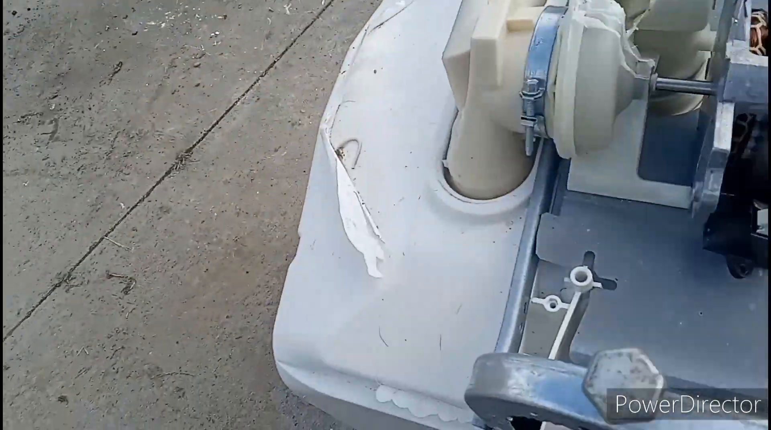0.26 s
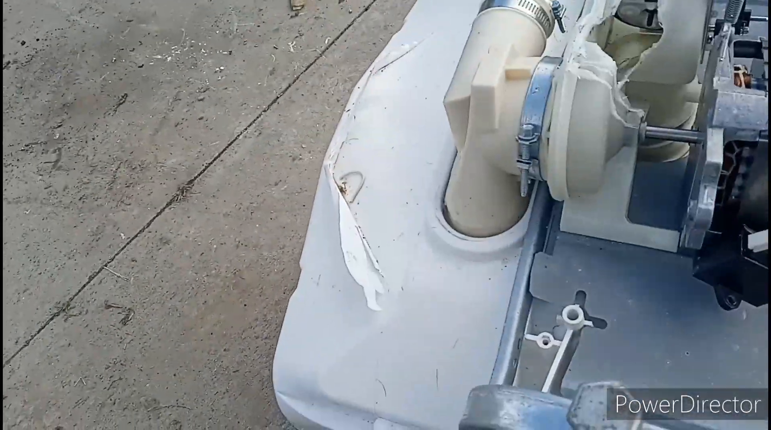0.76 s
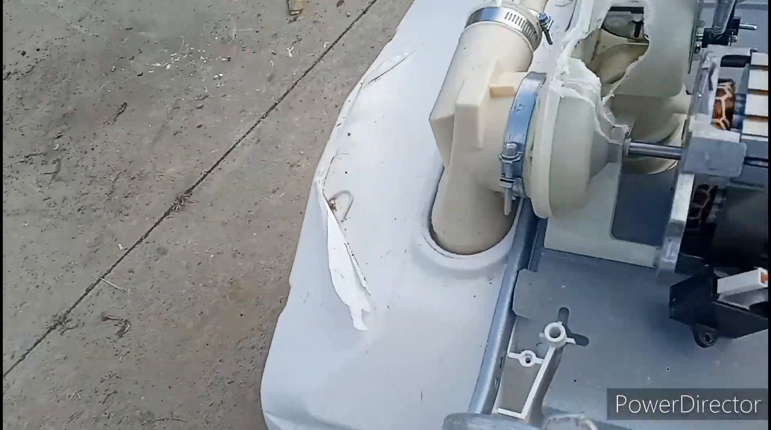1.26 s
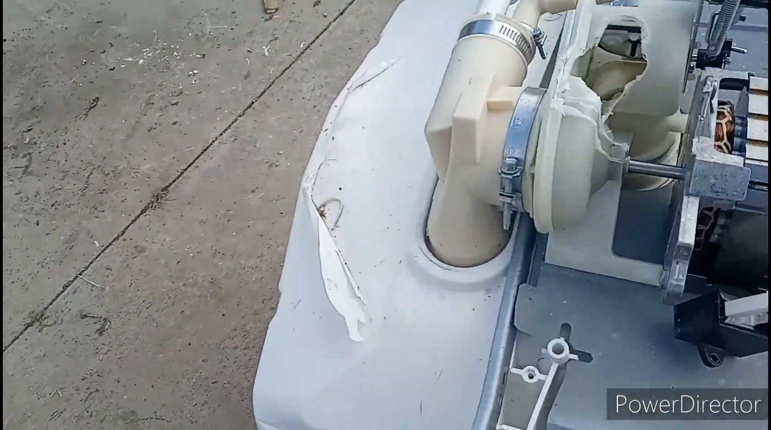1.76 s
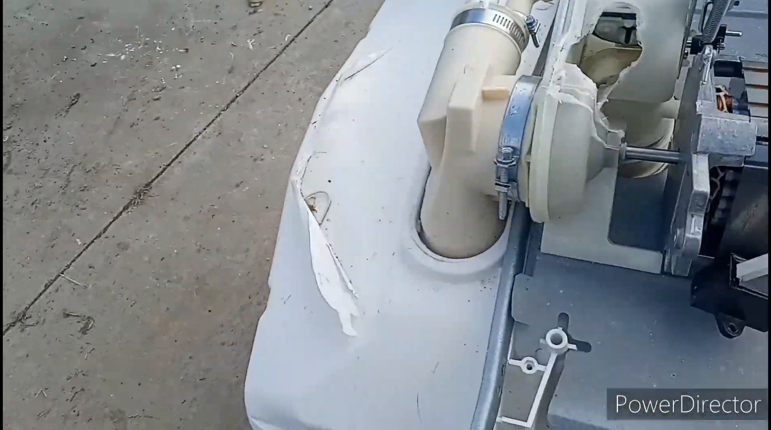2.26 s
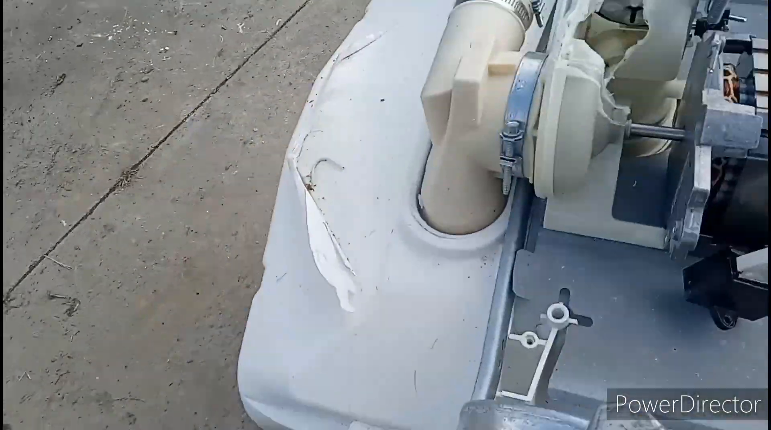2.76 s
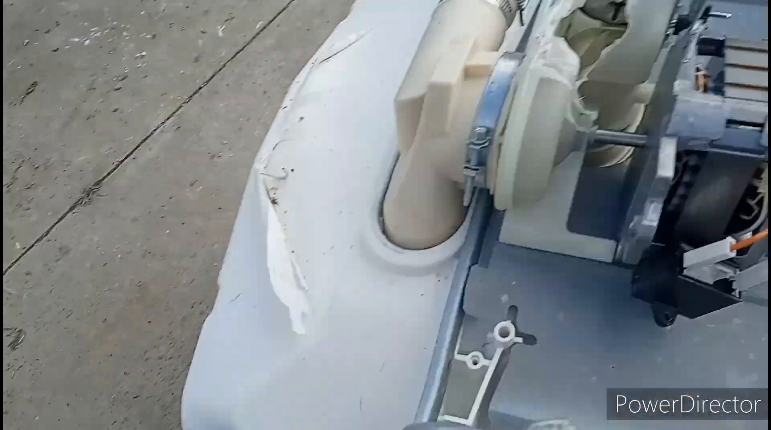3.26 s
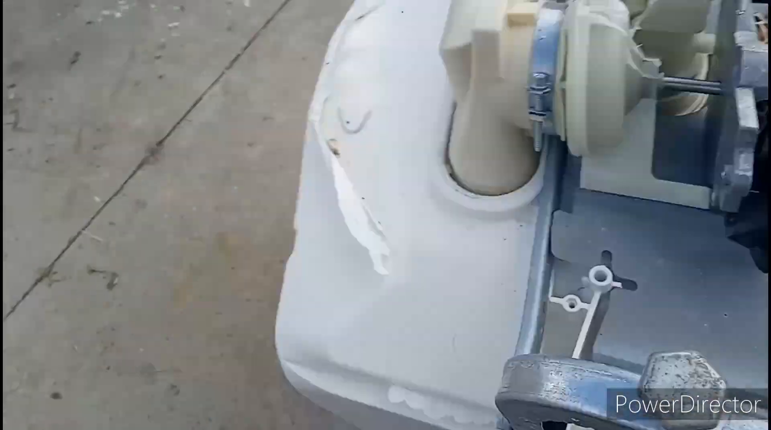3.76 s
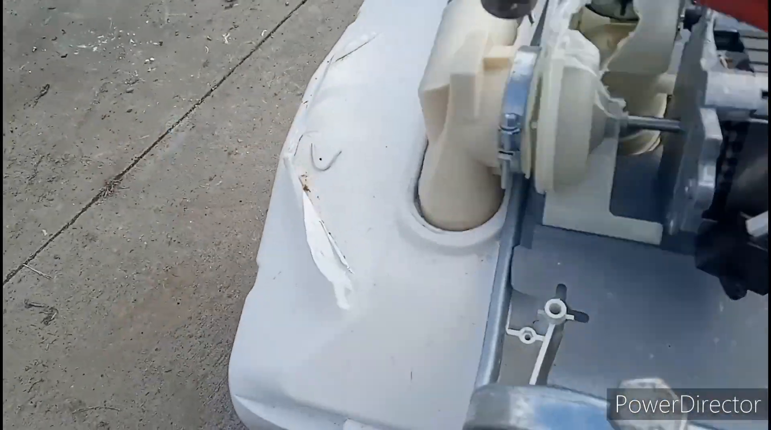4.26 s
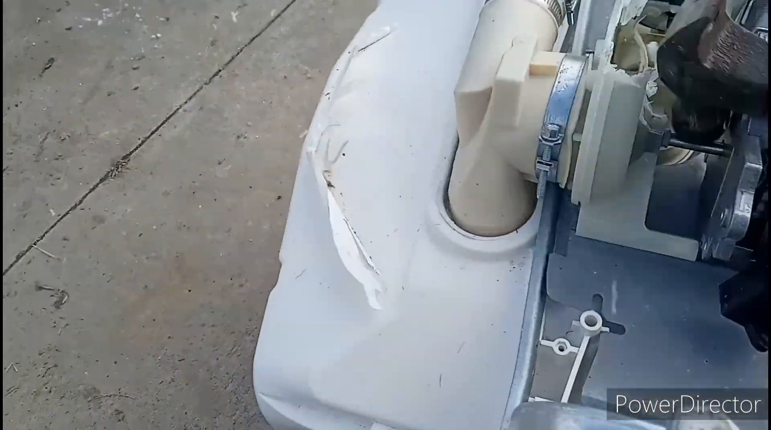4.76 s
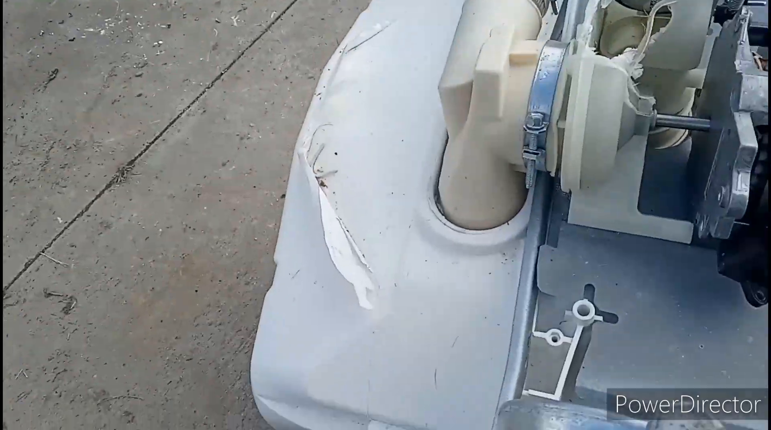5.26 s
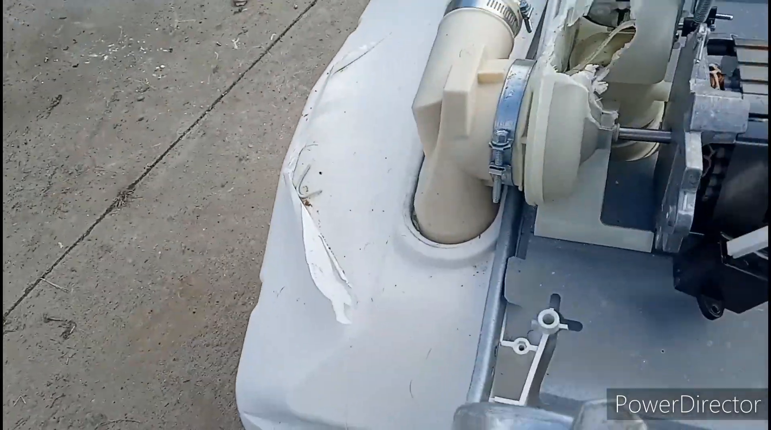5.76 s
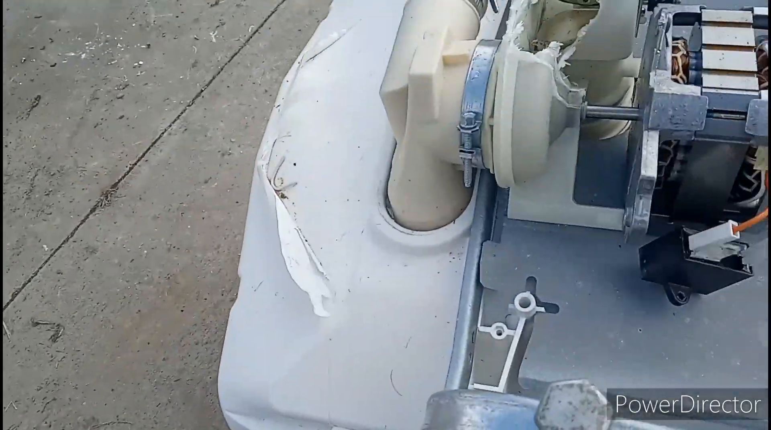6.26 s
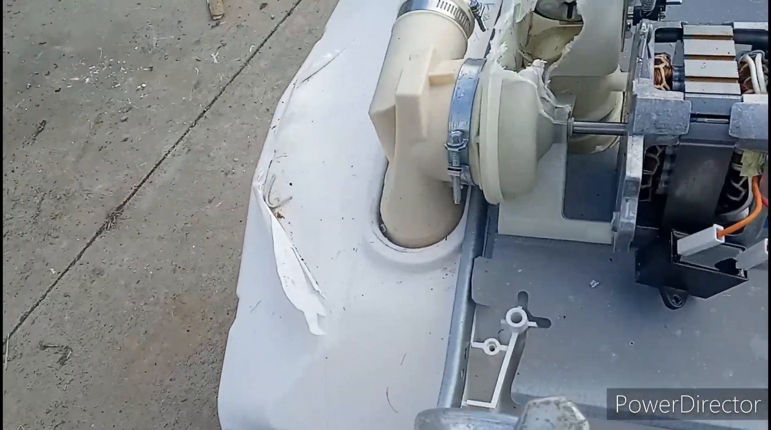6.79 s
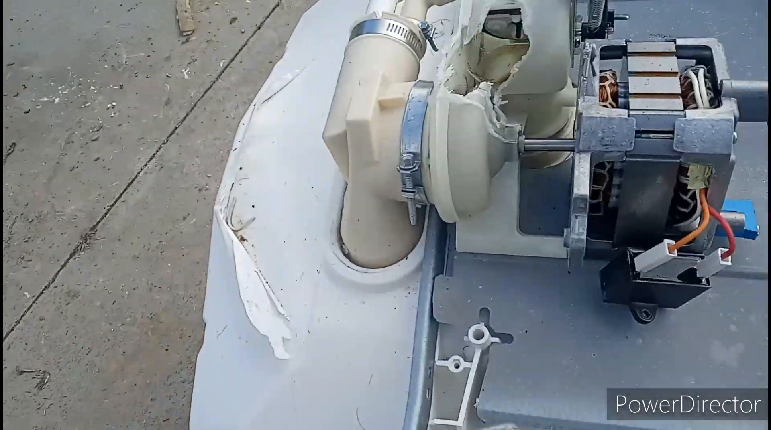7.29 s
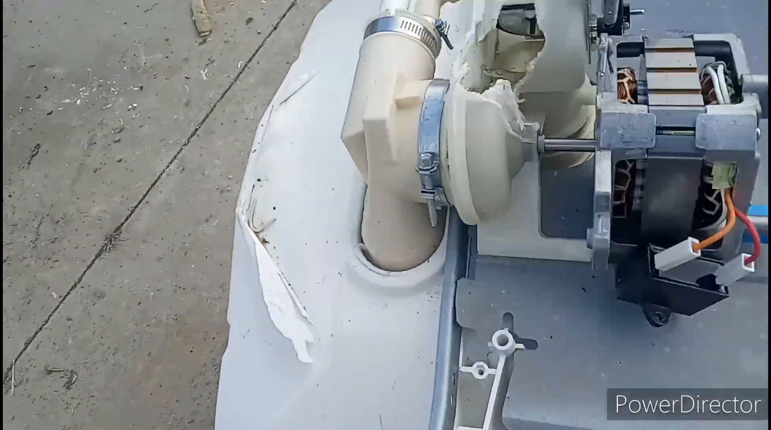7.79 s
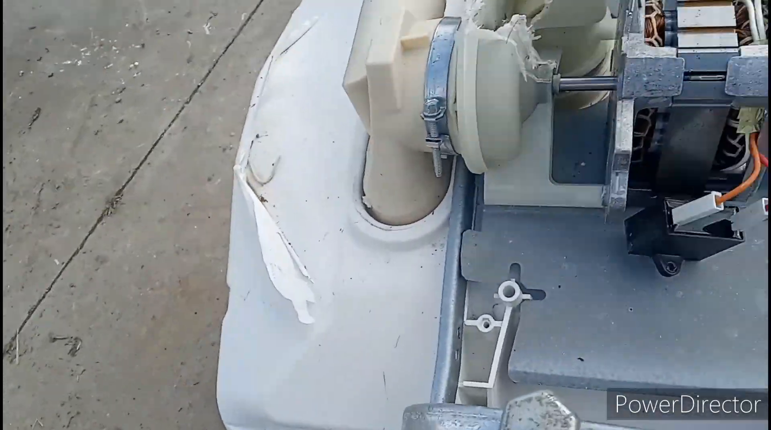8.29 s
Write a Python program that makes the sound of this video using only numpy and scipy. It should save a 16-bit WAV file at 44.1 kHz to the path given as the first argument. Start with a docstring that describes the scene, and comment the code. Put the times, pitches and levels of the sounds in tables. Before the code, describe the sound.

The tail of a blow already under way opens the scene, then hammer hits land at about 0.5, 1.0, 1.6, 2.1, 2.7, 3.3, 3.8, 4.4, 4.9, 5.5, 6.1, 6.6, 7.2, 7.7 and 8.3 seconds. Each is a hard, crunchy plastic crack with clashing metal, a hollow low boom and a brief steel ring, then a quick double rebound knock and a shuddering rattle. The fullest booms come from 1 to 4 seconds; the blow at 4.9 is lighter. Loose metal clacks follow many hits, notably at 1.1, 4.0, 4.5 and 6.15. Dry snaps crack near 1.65, 2.16, 3.3, 4.45, 5.0, 5.6 and 7.3, with tiny scrapes at 1.4, 5.1, 5.3 and 6.9. Dull base thuds come around 4.0, 4.6 and 6.5, strongest at 7.0 to 7.1. Close stereo, slightly right, short yard reverberation, faint air and uneven rumble.

```python
"""Hammer blows on a plastic pump

A hammer smashes the plastic housing of a motor-driven pump in a concrete yard, about two blows a second.
Damped modes sound the hollow base, shell and steel; shaped noise makes the cracks, clashes, rattle and scrapes.
The assembly rocks back, loose parts clack, broken edges snap and scrape, and the base thuds as it shifts.
Walls return a diffuse tail over faint air and rumble; noise suppression and a peak limiter finish the sound."""
import sys
import numpy as np
from scipy import signal
from scipy.fft import rfft, irfft, next_fast_len
from scipy.io import wavfile
from scipy.ndimage import uniform_filter1d, minimum_filter1d, map_coordinates

SR = 44100
rng = np.random.default_rng(int(sys.argv[2]) if len(sys.argv) > 2 else 0)


def dump(signal):
    """Clip the signal to [-1, 1] and save it as 16-bit WAV at the path in sys.argv[1]."""
    limited = np.clip(np.atleast_2d(signal).T, -1, 1)
    pcm = np.round(limited * 32767).astype(np.int16)
    wavfile.write(sys.argv[1], SR, pcm)


N = 376173  # samples in the scene
T = np.arange(int(.7 * SR)) / SR  # seconds within one sound event


def amp(db):
    """Logarithmic level: decibels to amplitude gain."""
    return 10 ** (np.asarray(db) / 20)


def unit(x):
    """Power normalisation: scale to rms 1."""
    return x / np.sqrt(np.mean(x ** 2) + 1e-20)


def along(points, hz):
    """Logarithmic frequency scale: interpolate (Hz, value) points along it."""
    f, v = np.transpose(points)
    return np.interp(np.log(hz + 1), np.log(f + 1), v)


def fade(t60, t=T):
    """Exponential damping: 60 dB down after t60 seconds."""
    return np.exp(-np.log(1000) * t / t60)


def swell(rise):
    """Exponential build-up with a time constant of rise seconds."""
    return 1 - np.exp(-T / rise)


def wobble(rate, n):
    """Slow random modulation: a smooth curve through rate random knots a second."""
    knots = rng.standard_normal(int(n * rate / SR) + 4)
    return map_coordinates(knots, [np.arange(n) * rate / SR])


def add(track, s, sound):
    """Superposition: mix a sound into a stereo track at s seconds, cropped to the scene."""
    i = round(s * SR)
    a, b = np.clip([i, i + sound.shape[-1]], 0, N)
    track[:, a:b] += sound[..., a - i:b - i]


def noise(spectrum, alike, n=len(T), ripple_db=0, width_hz=100):
    """Spectral shaping: stereo noise of rms 1, its ripple standing for the resonances a contact excites."""
    m = next_fast_len(n)
    hz = np.fft.rfftfreq(m, 1 / SR)
    # sharing the power between mid and side sets the left-right correlation
    turn = np.arccos(np.clip(along(alike, hz), -1, 1)) / 2
    ripple = np.interp(hz / width_hz, np.arange(2048), rng.standard_normal(2048))
    gain = amp(along(spectrum, hz) + ripple_db * ripple)
    white = rfft(rng.standard_normal((2, m)))
    mid, side = irfft(white * gain * [np.cos(turn), np.sin(turn)], m)[:, :n]
    return unit(np.array([mid + side, mid - side]))


def ring(modes, scatter_db, detune, spread):
    """Modal superposition: damped sines, spread radians between channels, rms 1 over the first 70 ms."""
    x = np.zeros((2, len(T)))
    for hz, db, t60 in modes:
        phase = 2 * np.pi * (hz * (1 + detune * rng.normal()) * T + rng.random())
        strength = amp(db + scatter_db * rng.normal())
        offset = spread * rng.choice([-1, 1]) * np.array([[.5], [-.5]])
        x += strength * fade(t60) * np.sin(phase + offset)
    return x / np.sqrt(np.mean(x[:, T < .07] ** 2))


def chatter(rate, t60, spread_db, bed):
    """Shot process: an rms 1 envelope of random tiny contacts, rate a second, over a smooth bed."""
    struck = rng.random(len(T)) < rate / SR
    contacts = struck * amp(spread_db * rng.standard_normal(len(T))) ** 2
    power = np.abs(signal.fftconvolve(contacts, fade(t60) ** 2)[:len(T)])
    return unit(np.sqrt(power / (power.mean() + 1e-12) + bed))


def crunch(hold, t60):
    """Sustained contact: hardest at first touch, held for about hold seconds, then damped."""
    contact = 1 + 1.1 * fade(.04)
    return contact * swell(0.00051) / np.sqrt(1 + fade(t60, hold - T) ** 2)


# Hammer blows. Each row: start in seconds, then relative levels in dB of the strike, base boom, pump shell
# and rebound knock, knock pitch in Hz, relative rattle level in dB, settling time in seconds.
BLOWS = [(-0.04, -20.5, -28.5, -15.5, -23, 588, -33.5, 0.4),
         (0.4763, -16.5, -19, -19, -7.5, 830, -30.5, 0.38),
         (1.008, -16, -13, -13.5, -12.5, 784, -36.5, 0.37), (1.5742, -16, -17, -17.5, -13, 980, -32.5, .36),
         (2.1053, -17.5, -17, -14.5, -23.5, 950, -33, 0.29), (2.665, -17, -18, -16.5, -7.5, 880, -36, 0.54),
         (3.2556, -19, -22.5, -16.5, -13, 1064, -28, 0.47),
         (3.814, -17, -17.5, -14.5, -5.5, 915, -33, 0.27),
         (4.3743, -16.2, -15, -16.5, -6, 930, -36.5, 0.38),
         (4.905, -21.5, -29.5, -19, -27.5, 954, -35.5, 0.23),
         (5.5122, -20.5, -22.5, -17, -22, 1090, -28, .42), (6.0851, -20, -19, -13, -4.5, 1090, -36, 0.4),
         (6.639, -20, -23, -19, -18, 1320, -31, 0.35), (7.184, -18.5, -23.5, -17.5, -3.5, 1010, -30, 0.34),
         (7.7289, -17.5, -18.5, -20.5, -8, 975, -26.5, .24),
         (8.286, -16.5, -26, -17.5, 0.5, 793, -31, 0.32)]
# Modes of the hollow plastic base, of the pump shell, and of the steel frame, shaft and hose clamp.
# Each row: nominal frequency in Hz, relative level in dB, t60 in seconds.
BASE_MODES = [(61.5, -21, 0.33), (96.6, -7, 0.34), (112.8, -0.5, 0.24), (146.2, -11, 0.39)]
SHELL_MODES = [(169.2, -13.5, 0.29), (199.8, -10.5, 0.21), (235.5, -10.5, .24), (291.5, 0.5, 0.18),
               (320.8, -5, 0.19), (352.7, -7, 0.16), (387, -13, 0.25), (439, -12.5, 0.18)]
STEEL_MODES = [(798, -3, .22), (888, -3, .2), (1044, -1, .22), (1182, 0, .22), (1980, -8, .3),
               (2510, -6, .2), (2656, -5, .2), (2828, -6, .22), (4258, -10, .2), (4496, -8, .2),
               (5071, -12, .2), (5950, -12, .18), (6691, -14, .18), (9366, -16, .18), (10549, -18, .18),
               (11222, -17, .18), (12893, -19, .18), (15004, -13, .18)]
# Spectra of the clashing parts and of cracking plastic. Each row: frequency in Hz, relative dB per Hz.
CLANG = [(40, -53), (150, -27.5), (350, -5), (550, -10), (750, -2), (900, -5), (1150, -2), (1500, -8.5),
         (2200, -25.5), (5000, -48)]
CRACK = [(100, -45), (500, -23), (1300, -8), (1900, 0), (2700, 0), (3500, -1.5), (6200, -3.5), (7200, -6),
         (8000, -13.5), (12000, -13), (13900, -16), (14700, -4.5), (15600, -22)]
# Left-right likeness of sounds close by. Each row: frequency in Hz, correlation from 0 to 1.
NEAR = [(60, .88), (300, .92), (650, .82), (1100, .5), (2000, .36), (3500, .36), (7000, .2), (15000, .05)]
CLANG_DB, CRACK_DB, STEEL_DB = 5.5, 9, -4.5  # dB added to the strike's level for each part


def hammer():
    """Impact excitation: a sharp contact and dense crunch, while hollow parts boom and steel rings."""
    out = np.zeros((2, N))
    for s, db, base_db, shell_db, *_ in BLOWS:
        boom = ring(BASE_MODES, scatter_db=1.5, detune=.012, spread=.45)
        shell = ring(SHELL_MODES, scatter_db=1.5, detune=.008, spread=.45)
        steel = ring(STEEL_MODES, scatter_db=3, detune=.002, spread=1.3)
        clang = noise(CLANG, NEAR, ripple_db=3, width_hz=55)
        crack = noise(CRACK, NEAR, ripple_db=3.5, width_hz=80)
        add(out, s, amp(base_db + 3) * swell(0.006) * boom)
        add(out, s, amp(shell_db + 4) * swell(0.0078) * shell)
        clashes = chatter(rate=240, t60=0.076, spread_db=3.5, bed=0.77)
        add(out, s, amp(db + CLANG_DB) * crunch(hold=0.038, t60=0.19) * clashes * clang)
        splinters = chatter(rate=300, t60=.018, spread_db=3, bed=.8)
        add(out, s, amp(db + CRACK_DB) * crunch(hold=0.031, t60=0.19) * splinters * crack)
        add(out, s, amp(db + STEEL_DB) * swell(0.00092) * steel)
    return out


# Spectra of the shudder and of the ticking parts. Each row: frequency in Hz, relative dB per Hz.
RATTLE = [(30, -25.5), (60, -7), (110, 14), (200, 5.5), (300, 6), (550, 3), (1100, 1.5), (1500, -5),
          (2000, -6), (3000, -5.5), (6300, -10), (8000, -18.5), (13900, -18.5), (15000, -15)]
TICK = [(200, -36.5), (800, -13.5), (1400, -2.5), (2000, -5), (2700, -4.5), (4000, -9), (6300, -10),
        (8000, -24.5), (13900, -22.5), (15000, -24)]
# Left-right likeness of widely spread sounds. Each row: frequency in Hz, correlation from 0 to 1.
FAR = [(30, 0.52), (90, .6), (300, 0.83), (700, 0.47), (1400, 0.33), (3000, 0.26), (8000, 0)]


def rattle():
    """Random repeated contact: after each blow the motor shudders to rest as its loose parts tick."""
    out = np.zeros((2, N))
    for s, *_, db, settling in BLOWS:
        settle = swell(.02) * fade(1.0) / (1 + (T / settling) ** 8)
        shudder = chatter(rate=70, t60=.055, spread_db=3.5, bed=.55)
        shudder = shudder * noise(RATTLE, FAR, ripple_db=3.5, width_hz=70)
        ticks = chatter(rate=55, t60=0.023, spread_db=2.5, bed=0)
        ticks = ticks * noise(TICK, NEAR, ripple_db=5, width_hz=150)
        rocking = unit(amp(2.5 * wobble(35, len(T))))
        add(out, s, amp(db + 11.5) * settle * rocking * (shudder + amp(-8) * ticks))
    return out


# Decay of the yard's tail. Each row: frequency in Hz, t60 in seconds.
YARD = [(80, 0.94), (300, 0.84), (1000, 0.75), (3000, 0.65), (7000, 0.56), (15000, 0.54)]


def yard(x):
    """Diffuse reverberation: walls return a dense tail, the treble dying first."""
    diffuse = noise([(100, 1), (5000, -1.2), (9000, -1.6)], FAR)
    hz, t, z = signal.stft(diffuse, SR, nperseg=256)
    decaying = z * fade(along(YARD, hz)[:, None], t)
    tail = signal.istft(decaying, SR, nperseg=256)[1][:, :len(T)] * swell(0.019)
    return signal.fftconvolve(x.mean(0)[None], tail / np.linalg.norm(tail[0]), axes=1)[:, :N]


# Spectra of outdoor air and of the low rumble. Each row: frequency in Hz, relative dB per Hz.
AIR = [(25, -20.5), (60, -8.5), (140, 8), (200, -34), (400, -24.5), (1000, -12), (2500, -15.5), (6000, -21),
       (9000, -42), (15000, -43)]
RUMBLE = [(25, -23.5), (45, -27), (70, -3.5), (110, -1), (142, 2.5), (190, -14), (300, -26.5), (600, -31),
          (1500, -52.5)]
# Course of the rumble. Each row: time in seconds, level in dB before its random wobble.
RUMBLE_DB = [(0.0, -32.5), (0.81, -47.5), (2.33, -37.5), (2.47, -53.5), (4.68, -36.5), (5.53, -58),
             (5.65, -41), (7.43, -36), (8.2, -42.5), (8.53, -32)]


def background():
    """Stationary and modulated noise: faint outdoor air and an uneven low rumble."""
    level_db = np.interp(np.arange(N) / SR, *np.transpose(RUMBLE_DB))
    rumble = amp(level_db + 4.7 * wobble(12, N)) * noise(RUMBLE, FAR, N)
    return rumble + amp(-58) * noise(AIR, FAR, N)


# rocking back onto the frame: first flight in seconds, ratio of the next to it, loss in dB per landing
REBOUND_S, REBOUND_SHRINK, REBOUND_LOSS_DB = .048, .65, 13.5


def knocks():
    """Inelastic rebound: the assembly lands twice, sooner and softer the second time, with a hollow ring."""
    out = np.zeros((2, N))
    for s, _, _, _, db, hz, *_ in BLOWS:
        band = [(hz / 4, -35), (hz / 1.2, -12), (hz, 0), (hz * 1.3, -12), (hz * 4, -35)]
        for k in range(2):
            s += REBOUND_S * REBOUND_SHRINK ** k
            knock = swell(0.0022) * fade(0.11) * noise(band, NEAR)
            add(out, s, amp(db - REBOUND_LOSS_DB * k) * knock / np.abs(knock).max())
    return out


# Spectrum of a tap's bright edge. Each row: frequency in Hz, relative dB per Hz.
EDGE = [(1500, -55), (3500, 2.5), (4500, 3.5), (6600, 11), (8000, -2), (11500, -0.5), (13900, 0.5),
        (15000, -17.5)]


def tap(hz, body_db, edge_db):
    """Brief hard impact: a body around hz under a bright edge, then a faint ring of the parts around it."""
    band = [(hz / 6, -30), (hz / 2.5, -12), (hz / 1.2, -5), (hz, 0),
            (hz * 1.3, -6), (hz * 2, -12), (hz * 4, -32), (hz * 6, -50)]
    body = noise(band, NEAR, ripple_db=4, width_hz=150)
    edge = noise(EDGE, NEAR, ripple_db=4, width_hz=200)
    decay = fade(0.024) + 0.23 * fade(0.17)
    return swell(.0002) * decay * (amp(body_db) * body + amp(edge_db) * edge)


# Loose metal parts landing. Each row: start in seconds, relative level in dB, nominal pitch in Hz.
CLACKS = [(0.3117, -42.5, 2280), (0.3666, -34, 1890), (0.6389, -30, 1710), (0.6916, -31.5, 1960),
          (0.8115, -40, 3500), (1.1388, -22, 2093), (1.1912, -27.5, 1380), (1.221, -33, 2200),
          (1.3448, -32.5, 3420), (1.4268, -32.5, 1980), (1.442, -35, 2510), (1.514, -37, 2560),
          (1.9145, -36.5, 2290), (2.0128, -42.5, 1890), (2.858, -32.5, 1990), (3.057, -34.5, 2080),
          (3.984, -23.5, 2020), (4.0648, -27.5, 1980), (4.0928, -28.5, 1970), (4.185, -39, 2100),
          (4.2228, -42.5, 2180), (4.5366, -21, 1920), (4.6086, -30.5, 1994), (4.6458, -32.5, 1940),
          (4.7496, -39, 1960), (5.0517, -30.5, 1980), (5.0977, -30, 1455), (5.118, -33, 2020),
          (5.7667, -36, 1920), (6.154, -15.5, 1450), (6.829, -29, 1990), (6.8505, -26.5, 2010),
          (7.3537, -29.5, 2480), (7.5086, -37, 2300), (8.0516, -37, 2620), (8.452, -30.5, 2400)]
# relative dB of each clack's body, bright edge, ring and bounce
CLACK_DB, CLACK_EDGE_DB, CLACK_RING_DB, CLACK_BOUNCE_DB = 4, -8, -13, -11


def clacks():
    """Impact and free vibration: a loose part clacks, rings briefly at its own pitch and bounces once."""
    out = np.zeros((2, N))
    for s, db, hz in CLACKS:
        modes = [(hz, 0, .028), (hz * 1.06, -5, .04), (hz * .72, -7, .022)]
        part = ring(modes, scatter_db=1.5, detune=.01, spread=1)
        part *= amp(CLACK_RING_DB) * swell(.0004)
        bounce_s = rng.uniform(.006, .016)
        add(out, s, amp(db) * (tap(hz, CLACK_DB, CLACK_EDGE_DB) + part))
        bounce = tap(hz, CLACK_DB, CLACK_EDGE_DB) + part
        add(out, s + bounce_s, amp(db + CLACK_BOUNCE_DB) * bounce)
    return out


# Cracked plastic snapping. Each row: start in seconds, relative level in dB.
SNAPS = [(0.5714, -21.5), (1.514, -34.5), (1.651, -15.5), (1.672, -13), (1.8638, -31), (2.157, -11),
         (2.1705, -19), (2.1765, -14), (2.818, -17), (2.9564, -36.5), (3.325, -13), (4.452, -12),
         (4.9831, -13.5), (4.9917, -14), (5.3229, -27), (5.341, -30.5), (5.351, -29.5), (5.597, -11.5),
         (6.157, -13), (6.1964, -28), (6.74, -19), (7.2995, -13.5), (7.9625, -27.5)]
# the broken edge's own pitch in Hz, its relative level in dB, and that of the bright burst over it
SNAP_BODY_HZ, SNAP_BODY_DB, SNAP_EDGE_DB = 3870, -4, 0


def snaps():
    """Elastic release: the cracked housing springs back with bright, dry snaps."""
    out = np.zeros((2, N))
    for s, db in SNAPS:
        add(out, s, amp(db) * tap(SNAP_BODY_HZ, SNAP_BODY_DB, SNAP_EDGE_DB))
    return out


# Short scrapes of broken plastic. Each row: start in seconds, stroke length in seconds, relative level in dB.
SCRAPES = [(1.4, 0.022, -29), (2.476, .006, -43.5), (5.099, 0.018, -33), (5.331, 0.02, -34),
           (6.879, 0.021, -27.5)]
# Spectrum of a scrape. Each row: frequency in Hz, relative dB per Hz.
SCRAPE = [(80, -49.5), (300, -17), (600, -7.5), (900, 7.5), (1300, -6.5), (3000, -3.5), (4500, -4),
          (6500, -5.5), (8000, -14.5), (12000, -18), (15000, -20)]


def scrapes():
    """Stick-slip friction: broken edges slide over each other in a quick run of random slips."""
    out = np.zeros((2, N))
    for s, length, db in SCRAPES:
        stroke = swell(0.001) / np.sqrt(1 + fade(0.1, length - T) ** 2)
        slips = chatter(rate=520, t60=0.015, spread_db=6.5, bed=0.35)
        add(out, s, amp(db) * stroke * slips * noise(SCRAPE, NEAR, ripple_db=5.0))
    return out


# Dull thuds as the base shifts. Each row: start in seconds, peak of the bump in dB, nominal pitch in Hz.
THUDS = [(4.029, -20, 169), (4.076, -23, 102), (4.602, -15.5, 289), (4.655, -17, 130), (4.693, -18.5, 230),
         (6.509, -22.5, 196), (6.546, -23, 120), (6.605, -24, 160), (6.903, -21, 119.5),
         (6.982, -19.5, 103), (7.006, -12.5, 177), (7.127, -8, 150)]
# Spectrum of the base rubbing on concrete. Each row: frequency in Hz, relative dB per Hz.
SCUFF = [(80, -12), (200, 3.5), (450, 2.5), (800, -10), (1400, -28.5), (2500, -46.5), (5000, -80)]
SCUFF_DB = -8  # dB relative to the bump's peak, before the scuff's envelope


def thuds():
    """Heavily damped impact: soft bumps of the base, each with a dull scuff on the concrete."""
    out = np.zeros((2, N))
    for s, db, hz in THUDS:
        modes = [(hz * .6, -5, .07), (hz, 0, .06), (hz * 1.5, -3, .05),
                 (hz * 2.3, -7, .04), (hz * 3.5, -13, .035), (hz * 5.3, -22, .03)]
        bump = swell(.006) * ring(modes, scatter_db=2, detune=.03, spread=.45)
        scuff = swell(.006) * fade(0.077) * noise(SCUFF, NEAR, ripple_db=1.5)
        add(out, s, amp(db) * (bump / np.abs(bump).max() + amp(SCUFF_DB) * scuff))
    return out


def filtered(x, response):
    """Linear filtering: multiply the spectrum of x by a response of frequency."""
    m = next_fast_len(N + SR // 2)
    return irfft(rfft(x, m) * response(np.fft.rfftfreq(m, 1 / SR)), m)[..., :N]


# Shading of the left microphone, mostly in the treble. Each row: frequency in Hz, gain in dB.
LEFT = [(100, -.3), (4000, -.4), (9000, -1.7), (15000, -2.5)]


def scene():
    """Interaural-style cues: the motor lies a little to the right, so the left hears it later and duller."""
    left, right = hammer() + knocks() + clacks() + snaps() + scrapes() + thuds()
    direct = np.array([np.pad(left, (3, 0))[:N], right])  # left delayed by 3 samples
    left, right = direct + amp(-21) * yard(direct) + rattle() + background()
    return np.array([filtered(left, lambda hz: amp(along(LEFT, hz))), right])


def suppress(x, threshold_db, depth_db):
    """Spectral gating: whatever sinks near the threshold is turned down further, less so in the bass."""
    hz, _, z = signal.stft(x, SR, nperseg=512)
    power = np.mean(np.abs(z) ** 2, 0)
    power = uniform_filter1d(uniform_filter1d(power, size=3, axis=0), size=3, axis=1)
    power = np.abs(power)
    threshold = amp(threshold_db) ** 2 * hz ** 2 / (hz ** 2 + 500 ** 2)
    gain = np.maximum(power / (power + threshold[:, None] + 1e-20), amp(depth_db))
    return signal.istft(z * gain, SR, nperseg=512)[1][:, :N]


TOP_HZ = 15750  # upper band limit


def record(dry):
    """Dynamic range control: bass cut, noise suppression, fast limiter, clipping, then the band limit."""
    x = signal.sosfilt(signal.butter(4, 54, "highpass", fs=SR, output="sos"), dry)
    x = suppress(x, threshold_db=-72.5, depth_db=-9.0)
    needed = np.minimum(1, 1.1 / (np.abs(x).max(0) + 1e-9))
    gain = uniform_filter1d(minimum_filter1d(needed, size=50), size=36)
    held = np.clip(x * gain, -.97, .97)
    return filtered(held, lambda hz: 1 / (1 + (hz / TOP_HZ) ** 160))


dry = scene()
out = record(dry)
dump(out)
```